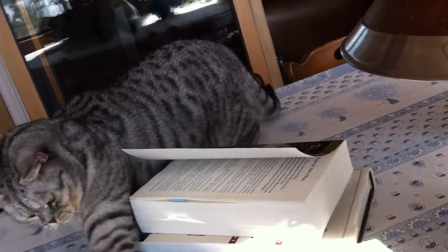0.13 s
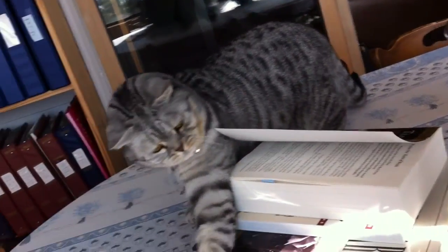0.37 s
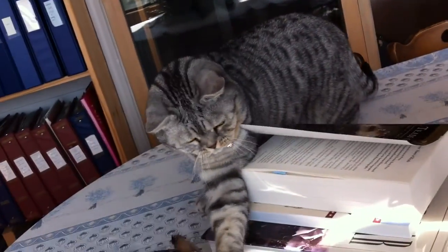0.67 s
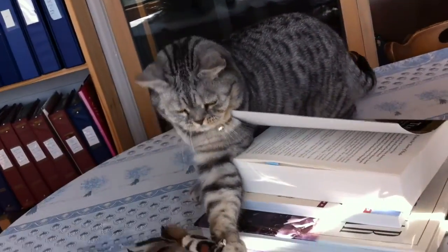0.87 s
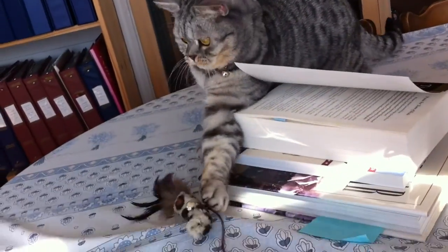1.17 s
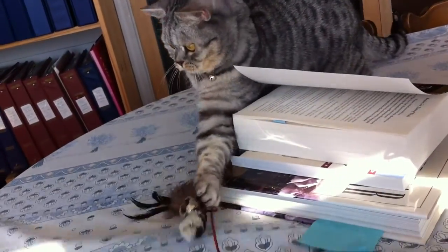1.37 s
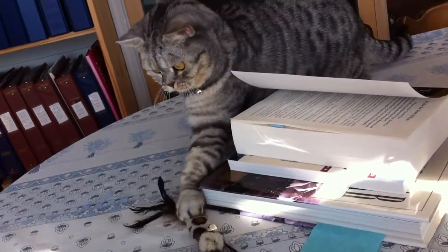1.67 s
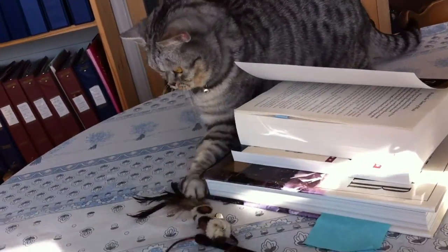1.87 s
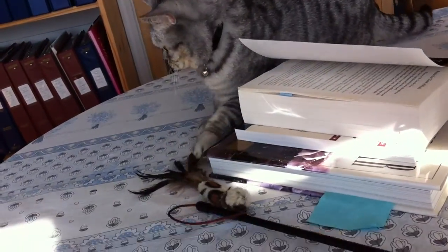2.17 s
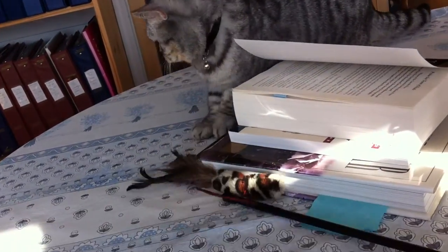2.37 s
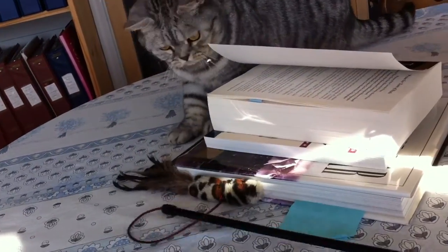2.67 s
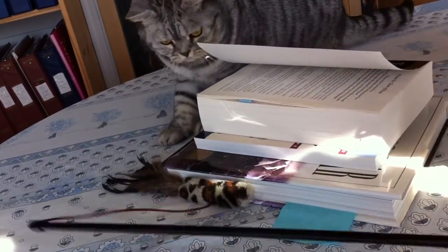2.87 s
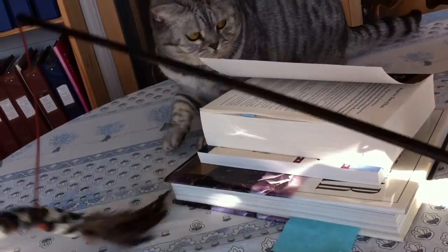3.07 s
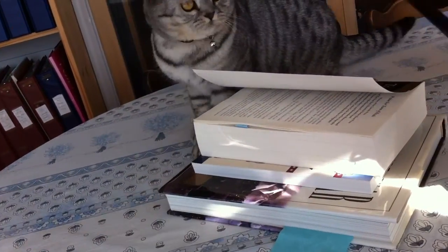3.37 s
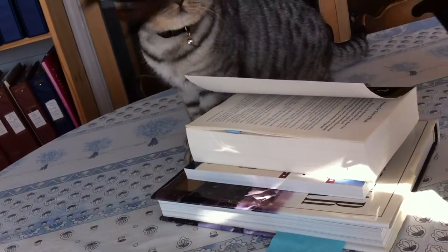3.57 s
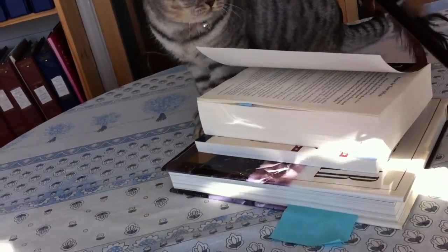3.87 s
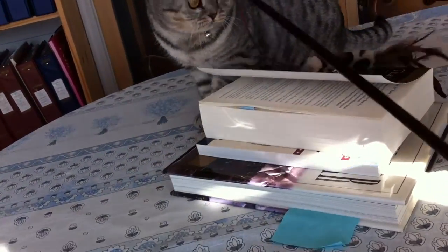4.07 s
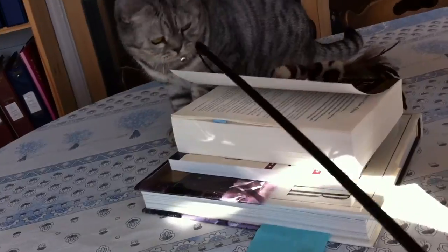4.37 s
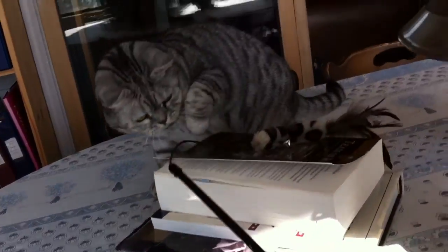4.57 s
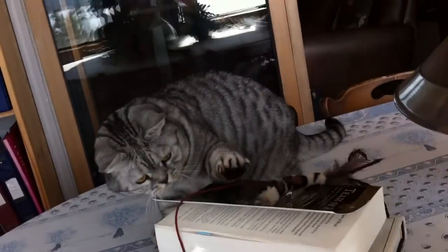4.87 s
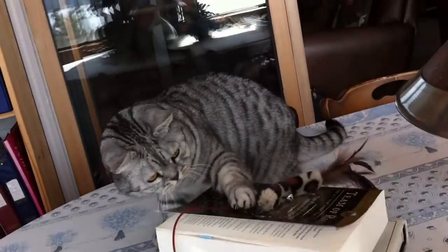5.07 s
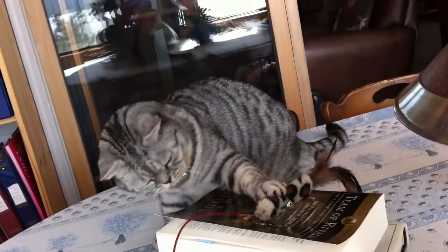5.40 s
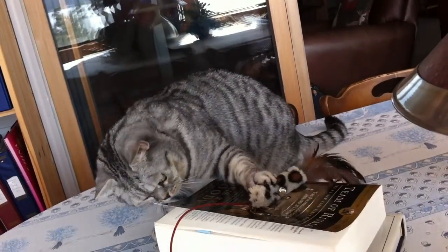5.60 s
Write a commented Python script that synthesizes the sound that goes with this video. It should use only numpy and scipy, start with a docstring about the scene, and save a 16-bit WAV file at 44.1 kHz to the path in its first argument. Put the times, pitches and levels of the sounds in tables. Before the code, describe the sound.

A small collar tag clinks and shivers as a cat plays with a feather toy on a book-stacked table, with dull taps over faint hum.

```python
"""A cat's collar pendant clinks as the cat plays with a feather wand on a cloth-covered table stacked with books.
Pendant and a tinier piece of metal, heard mostly at the start, are decaying sine modes with noise clicks.
The toy swishes as swelling coloured noise and taps the books as filtered noise bursts with book modes.
Paws thud as band-passed pushes; room air (noise), an appliance hum and a faint whine (sines) lie behind."""
import sys
import numpy as np
from scipy import signal
from scipy.fft import rfft, irfft
from scipy.io import wavfile
from scipy.ndimage import uniform_filter1d

SR = 44100
rng = np.random.default_rng(int(sys.argv[2]) if len(sys.argv) > 2 else 0)


def transcribe(signal):
    """Save signal, clipped to [-1, 1], as a 16-bit WAV file at the path in sys.argv[1]."""
    frames = np.atleast_2d(signal).T
    limited = np.clip(frames, -1, 1)
    pcm = np.round(limited * 32767).astype(np.int16)
    wavfile.write(sys.argv[1], SR, pcm)


N = 253071
TIME_S = np.arange(N) / SR
HIT_TIME_S = np.arange(SR // 4) / SR

# low and high mode clusters of the collar pendant: pitch_hz, relative_level_db, t60_s
PENDANT_LOW_MODES = [(5504, 1.5, 0.031), (5360, -6, 0.008), (5550, -9, 0.12), (5637, -5.5, 0.032),
                     (5937, -6.5, 0.026), (5930, -15, 0.07), (6474, -20, 0.1)]
PENDANT_HIGH_MODES = [(12200, -6, 0.039), (13020, 71, 0.017), (12600, -18, 0.016), (13700, -3, 0.079)]


def amp(db):
    """Decibels to gain."""
    return 10 ** (np.asarray(db) / 20)


def rms(x):
    """Root mean square."""
    return np.sqrt(np.mean(x ** 2))


def add(out, start_s, sound):
    """Mix a sound into out at start_s."""
    i = int(np.clip(start_s * SR, 0, N - 1))
    out[i:i + len(sound)] += sound[:N - i]


def on_log_axis(hz, points):
    """Interpolate (Hz, value) points on a log-frequency axis."""
    point_hz, value = np.transpose(points)
    return np.interp(np.log(hz + 1), np.log(point_hz), value)


def colour(x, points):
    """Shape the spectrum of x by (Hz, dB) points, at rms 1."""
    gain = amp(on_log_axis(np.fft.rfftfreq(len(x), 1 / SR), points))
    y = irfft(rfft(x) * gain, len(x))
    return y / rms(y)


def band(x, lo_hz, hi_hz, order=2):
    """Causal Butterworth band-pass."""
    edges_hz = [lo_hz, min(hi_hz, SR / 2 - 100)]
    return signal.sosfilt(signal.butter(order, edges_hz, "band", fs=SR, output="sos"), x)


def fade(t60_s):
    """Exponential decay of one hit, 60 dB down after t60_s."""
    return np.exp(-np.log(1000) * HIT_TIME_S / max(t60_s, 1e-4))


def hit_noise(t60_s):
    """White noise burst with exponential decay."""
    return rng.standard_normal(len(HIT_TIME_S)) * fade(t60_s)


def at_peak(x, db, size=132):
    """Scale a hit so that the rms of its loudest 3 ms is db."""
    loudest_power = uniform_filter1d(x ** 2, size, mode="constant").max()
    return x * amp(db) / np.sqrt(loudest_power)


def walk(rate_hz):
    """Smooth random wander at rms 1, from random steps at rate_hz."""
    step = int(SR / rate_hz)
    y = uniform_filter1d(np.repeat(rng.standard_normal(N // step + 1), step), step)[:N]
    return y / rms(y)


def swell(middle_s, length_s):
    """Gaussian stroke envelope: speeds up and slows down evenly about its middle."""
    return np.exp(-2 * ((TIME_S - middle_s) / length_s) ** 2)


def grains(spread_db):
    """Countless tiny fibre slips of unequal size: noise with a fast random level."""
    return rng.standard_normal(N) * amp(spread_db * walk(400))


def background(waver_db=2.0, phase_wander_rad=0.059):
    """Still room air as coloured noise, a nearly steady appliance hum and a faint electrical whine."""
    # air noise density: pitch_hz, relative_level_db_per_hz
    air_spectrum = [(15, -51), (25, -27), (48, -22), (97, -10), (134, -15), (161, 0.5), (242, -9),
                    (463, -10.5), (560, -16.5), (818, -19.5), (4370, -25.5), (5570, -23.5), (10700, -26.5),
                    (14800, -26.5), (16000, -43)]
    air_db = -67  # rms within 200-4500 Hz
    hum_hz, hum_db = 154.6, -69
    whine_hz, whine_db = 15000, -79.5

    air = colour(rng.standard_normal(N), air_spectrum)
    air *= amp(air_db) / rms(band(air, 200, 4500))
    hum_gain = amp(hum_db + waver_db * walk(3.4))
    hum = hum_gain * np.sin(2 * np.pi * hum_hz * TIME_S + phase_wander_rad * walk(2.7))
    whine = amp(whine_db) * np.sin(2 * np.pi * whine_hz * TIME_S)
    return air + np.sqrt(2) * (hum + whine)  # sqrt(2): sine peak for the rms level


def thuds(low_hz=115, high_hz=240, push_t60_s=0.0031):
    """A padded paw gives the table one soft push: a short decay, band-passed low."""
    # paw landings: start_s, peak_db
    paw_thuds = [(0.452, -46.5), (0.772, -45), (1.012, -50), (1.27, -54.5), (1.481, -52.5), (4.169, -42),
                 (4.37, -46.5), (4.521, -43), (4.554, -47.5), (4.658, -40)]
    out = np.zeros(N)
    thud = band(fade(push_t60_s), low_hz, high_hz, order=3)
    thud /= np.abs(thud).max()
    for start_s, peak_db in paw_thuds:
        add(out, start_s, amp(peak_db) * thud)
    return out


def taps(modes_db=-3, crack_spread=1.3):
    """Toy, wand and claws hit books: sharp contact, scuff, dull book modes; the spot hit sets the crack pitch."""
    # hits: start_s, body_db, crack_db, crack_hz, tick_db, scuff_t60_s, scuff_db (relative to contact)
    book_taps = [(0.316, -51, -37.5, 3400, -35.5, 0.056, 18), (1.134, -48, -38.5, 1190, -64, .13, 3),
                 (1.4796, -42.5, -43.5, 2970, -43.5, .07, -9.5), (1.557, -53.5, -76, 1610, -58, .13, 6),
                 (2.528, -70, -40.5, 3080, -39.5, 0.048, 23),
                 (4.0932, -28.5, -32.5, 2480, -38.5, 0.071, -0.5),
                 (4.518, -43.5, -51, 2190, -52.5, 0.15, 1), (4.555, -58.5, -57.5, 2515, -71, 0.25, 0),
                 (4.886, -61.5, -56.5, 2980, -59.5, 0.19, -12), (5.075, -52.5, -51, 2150, -58, .17, -3.5)]
    # book resonances: pitch_hz, width_hz, relative_level_db
    book_modes = [(345, 47, -6.5), (636, 38, 0), (664, 230, 3), (919, 41, 2.5), (1590, 150, -4),
                  (1910, 23, -13.5), (3000, 440, -36)]

    books = np.zeros(len(HIT_TIME_S))
    for k, (hz, width_hz, db) in enumerate(book_modes):
        decay = np.exp(-np.pi * width_hz * HIT_TIME_S)
        books += (-1) ** k * amp(db) * np.sin(2 * np.pi * hz * HIT_TIME_S) * decay

    out = np.zeros(N)
    for start_s, body_db, crack_db, crack_hz, tick_db, scuff_t60_s, scuff_db in book_taps:
        contact = hit_noise(0.0017)
        scuff = hit_noise(scuff_t60_s)
        force = at_peak(contact, 0) + at_peak(scuff, scuff_db)
        dull = band(force, 190, 1190, order=3)
        body = at_peak(dull, 0) + at_peak(books, modes_db)
        crack = band(force, crack_hz / crack_spread, crack_hz * crack_spread, order=1)
        tick = band(force, 8300, 10000, order=1)
        add(out, start_s, at_peak(body, body_db))
        add(out, start_s, at_peak(crack, crack_db))
        add(out, start_s, at_peak(tick, tick_db))
    # so light a blow moves no deep bass
    return band(out, 130, 18000)


def rustle(grain_db=3.0):
    """Feathers and string drag over cloth and paper; later fur and feathers brush the books: swelling noise."""
    # drag noise spectra: pitch_hz, relative_level_db
    hiss_spectrum = [(4000, -17.5), (6000, -7.5), (9000, 4), (11000, 4.5), (14000, -2), (16000, -17)]
    scrape_spectrum = [(250, -1), (600, 5.5), (1500, 2), (2400, 5), (3600, 11.5), (6000, 13), (9000, -13)]
    # toy strokes: middle_s, length_s, hiss_db, scrape_db
    toy_drags = [(0.01, 0.058, -44, -48), (0.102, 0.13, -52.5, -58), (0.218, .03, -53, -66),
                 (0.304, 0.046, -41.5, -52.5)]
    # brushing strokes: middle_s, length_s, level_db, centre_hz
    book_brushes = [(1.186, 0.22, -62.5, 9800), (1.517, 0.054, -60, 10000), (2.657, .03, -62, 2880),
                    (2.656, 0.04, -57.5, 8600), (2.796, .046, -68, 10200), (4.769, 0.12, -66.5, 599),
                    (4.89, .035, -65, 9900), (5.316, .11, -72, 1080), (5.549, 0.093, -68.5, 9300)]

    out = np.zeros(N)
    hiss = colour(grains(grain_db), hiss_spectrum)
    scrape = colour(grains(grain_db), scrape_spectrum)
    for middle_s, length_s, hiss_db, scrape_db in toy_drags:
        out += swell(middle_s, length_s) * (amp(hiss_db) * hiss + amp(scrape_db) * scrape)
    fibres = grains(grain_db)
    for middle_s, length_s, level_db, centre_hz in book_brushes:
        brush = band(fibres, centre_hz / 1.27, centre_hz * 1.37)
        out += amp(level_db) * swell(middle_s, length_s) * brush / rms(brush)
    return out


def ring(modes, detune, scatter_db=4):
    """One blow on small metal: where it lands decides each mode's share and sign."""
    out = np.zeros(len(HIT_TIME_S))
    for hz, db, t60_s in modes:
        level_chance, pitch_chance, sign_chance = rng.standard_normal(3)
        gain = np.sign(sign_chance) * amp(db + scatter_db * level_chance)
        mode_hz = hz * (1 + detune * pitch_chance)
        out += gain * np.sin(2 * np.pi * mode_hz * HIT_TIME_S) * fade(t60_s)
    return out


def jingle(blows, low_modes, high_modes, detune, click_db, bounce_db, bounce_s, hardening=0.25, count=3):
    """Metal meets metal: click and short ring, count contacts in all, each bounce_db below the last."""
    out = np.zeros(N)
    loudest_db = np.max(np.array(blows)[:, 1:])
    for start_s, low_db, high_db in blows:
        strength_db = max(low_db, high_db)
        # harder blows click more relative to their ring
        contact_db = strength_db + click_db + hardening * (strength_db - loudest_db)
        for k in range(count):
            tone = at_peak(ring(low_modes, detune), low_db) + at_peak(ring(high_modes, detune), high_db)
            click = at_peak(band(hit_noise(0.0031), 5600, 13300), contact_db + k * bounce_db / 2)
            add(out, start_s, amp(k * bounce_db) * (tone + click))
            start_s += bounce_s * (.5 + rng.random())
    # so small a piece radiates almost nothing below its lowest mode
    return band(out, 4800, 15000, order=5)


def trinket_tinkles():
    """A tiny piece of metal rings in two narrow mode groups, with very faint clicks."""
    # blows: start_s, low_db, high_db
    tinkle_blows = [(0.014, -29, -57), (0.037, -45, -58), (0.075, -45, -45), (0.088, -36.5, -47),
                    (0.121, -46, -61), (0.468, -63, -74), (0.515, -63.5, -81), (2.268, -53.5, -70)]
    # modes of the tiny piece: pitch_hz, relative_level_db, t60_s
    trinket_low_modes = [(11215, -4, .03), (11305, 0, .04), (11345, -3, .03)]
    trinket_high_modes = [(12600, 0, 0.137)]
    return jingle(tinkle_blows, trinket_low_modes, trinket_high_modes,
                  detune=0.00094, click_db=-32, bounce_db=-2.5, bounce_s=.009)


def pendant_shivers(rate_hz=70, jitter=0.91, scatter_db=5.0, dull_db=-11, count=60):
    """As the cat shifts its weight the pendant grazes its ring at uneven moments and with uneven force."""
    # trembling spells: start_s, length_s, level_db (at turn_share)
    trembling_spells = [(2.484, 0.14, -49.5), (2.67, 0.11, -62.5), (3.145, 0.041, -48.5),
                        (4.085, 0.083, -49.5), (4.278, .23, -72.5), (4.561, .05, -57), (4.677, 0.14, -67),
                        (4.862, 0.074, -58), (5.362, 0.025, -49.5)]
    # level sinks slowly up to turn_share of the spell, then faster
    turn_share, start_db, end_db = 0.51, 2, -8.5

    grazes = []
    for start_s, length_s, level_db in trembling_spells:
        for k, (early, force) in enumerate(rng.uniform(-1, 1, (count, 2))):
            age_s = (k + .5 + jitter * early / 2) / rate_hz
            if age_s < length_s:
                fall_db = np.interp(age_s / length_s, [0, turn_share, 1], [start_db, 0, end_db])
                low_db = level_db + fall_db + scatter_db * force
                grazes.append((start_s + age_s, low_db, low_db + dull_db))
    return jingle(grazes, PENDANT_LOW_MODES, PENDANT_HIGH_MODES,
                  detune=0.0043, click_db=-12, bounce_db=0, bounce_s=0, count=1)


def pendant_clinks():
    """Each collar jerk strikes the pendant; it swings out and falls back on its ring, weaker and duller."""
    # collar jerks: start_s, low_db, high_above_low_db
    collar_jerks = [(0.669, -66.5, -7), (0.757, -57, -12.5), (0.777, -57.5, -5), (1.004, -57, -14),
                    (1.058, -57, -21), (1.175, -55, 0), (1.188, -46.5, 2), (1.202, -59, 16),
                    (1.304, -59.5, -3), (1.409, -64.5, -4.5), (1.563, -53, 2), (1.582, -52, 7.5),
                    (1.838, -55.5, 2.5), (2.174, -53, 8.5), (2.276, -62, 7), (2.399, -62, -4),
                    (2.45, -59.5, 4.5), (2.473, -53, -9), (2.497, -50.5, -9), (2.642, -48.5, -17),
                    (3.0403, -40, -1), (3.052, -34.5, -4.5), (3.0737, -37.5, -3), (3.123, -56, 7),
                    (3.133, -45.5, -3.5), (3.213, -55, -7), (3.31, -64.5, -13), (3.519, -60.5, 0.5),
                    (3.61, -56.5, -15), (3.665, -61.5, -16), (3.794, -63.5, -8), (4.225, -60.5, -20),
                    (4.269, -54, -22), (5.103, -55.5, -18), (5.325, -58, -28), (5.3401, -38.5, 3),
                    (5.424, -49, 1.5), (5.527, -55, -2.5), (5.626, -64, -14), (5.659, -56, -18.5)]
    swing_s, swing_loss_db, swing_dull_db = .039, -13, -4

    blows = []
    for start_s, low_db, bright_db in collar_jerks:
        back_db = low_db + swing_loss_db
        blows.append((start_s, low_db, low_db + bright_db))
        blows.append((start_s + swing_s, back_db, back_db + bright_db + swing_dull_db))
    return jingle(blows, PENDANT_LOW_MODES, PENDANT_HIGH_MODES,
                  detune=0.003, click_db=-6.5, bounce_db=-4, bounce_s=.0045)


def room(x, wet_db, gap_s=0.0036):
    """Table and shelves throw sound back within a few ms; the tail dies fast among books and cloth."""
    # reverberation time: pitch_hz, t60_s
    room_decay = [(150, 0.27), (1000, .25), (5500, 0.21), (13000, 0.12)]
    t = np.arange(SR // 2) / SR
    edges_hz = np.geomspace(80, 20000, 9)
    noise = rng.standard_normal(len(t))
    tail = np.zeros(len(t))
    for lo_hz, hi_hz in zip(edges_hz, edges_hz[1:]):
        t60_s = on_log_axis(np.sqrt(lo_hz * hi_hz), room_decay)
        tail += band(noise, lo_hz, hi_hz) * np.exp(-np.log(1000) * t / t60_s)
    tail *= t > gap_s
    return x + amp(wet_db) * signal.fftconvolve(x, tail / np.linalg.norm(tail))[:N]


def scene():
    """All sources in the room, heard by one microphone."""
    metal = room(pendant_clinks() + pendant_shivers() + trinket_tinkles(), wet_db=-2.5)
    book_hits = room(taps(), wet_db=-10.5)
    paws = room(thuds(), wet_db=-9.5)
    return (metal + book_hits + paws + rustle() + background())[None]


def record(dry):
    """The recorder cuts the very top with a steep elliptic low-pass."""
    top_hz = 15900
    return signal.sosfilt(signal.ellip(8, .2, 70, top_hz, fs=SR, output="sos"), dry)


dry = scene()
out = record(dry)
transcribe(out)
```